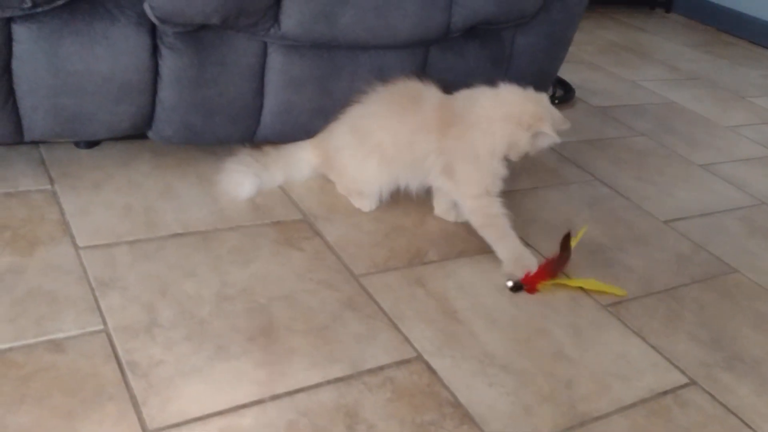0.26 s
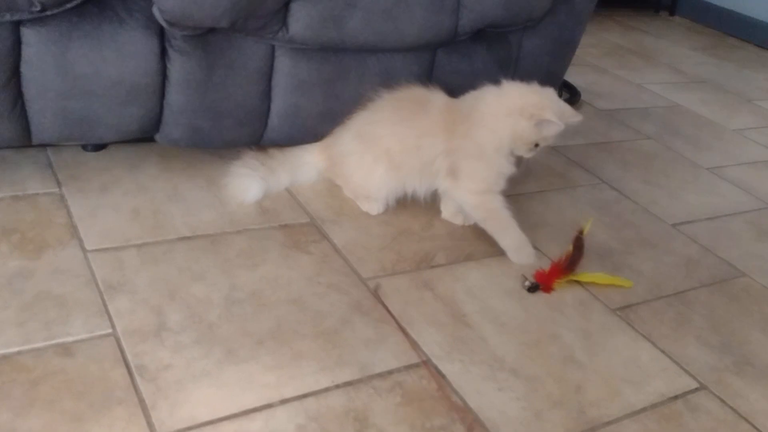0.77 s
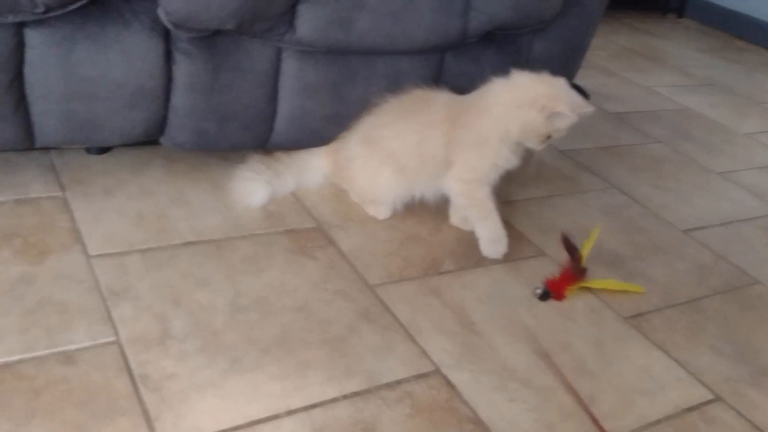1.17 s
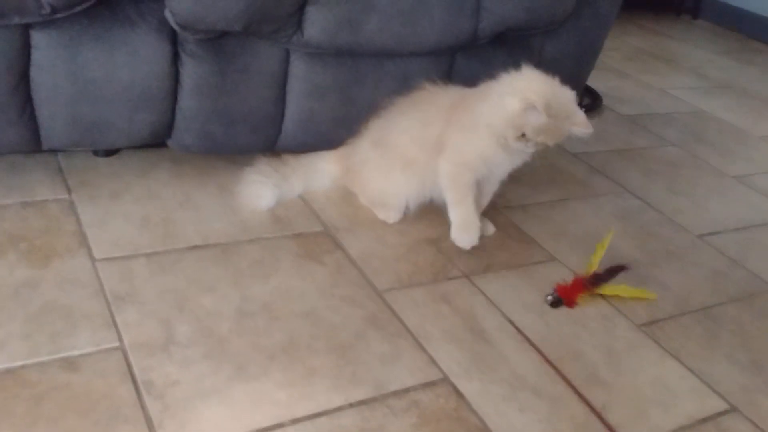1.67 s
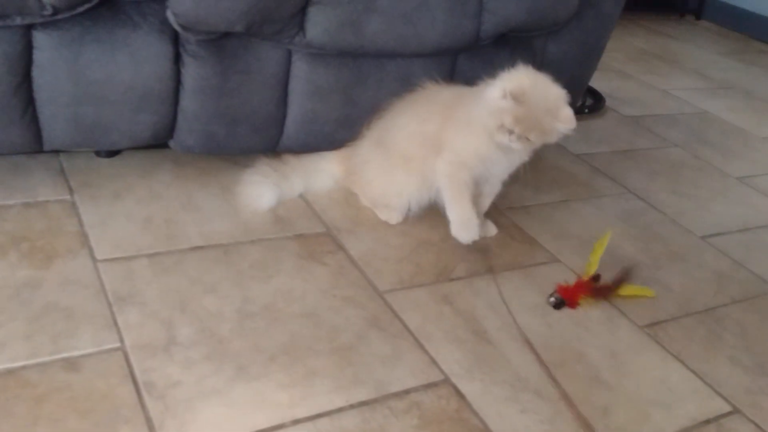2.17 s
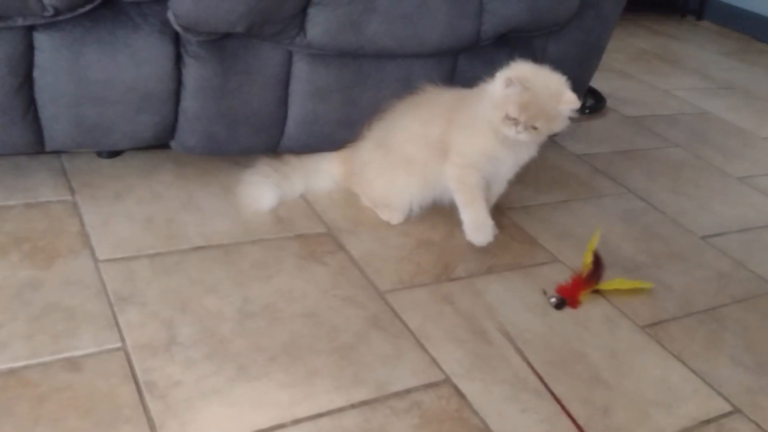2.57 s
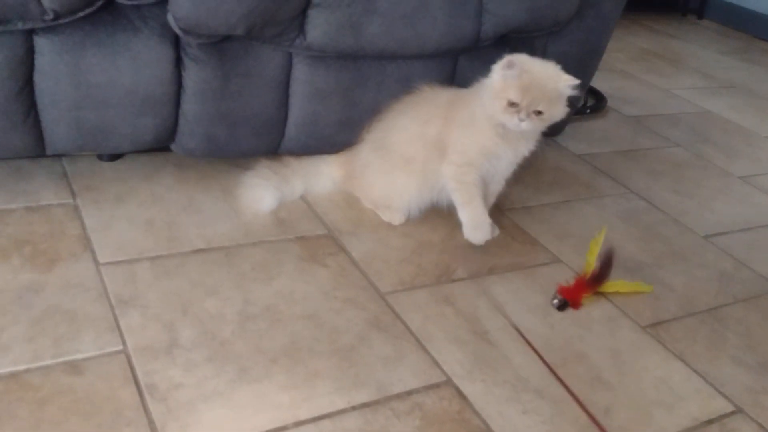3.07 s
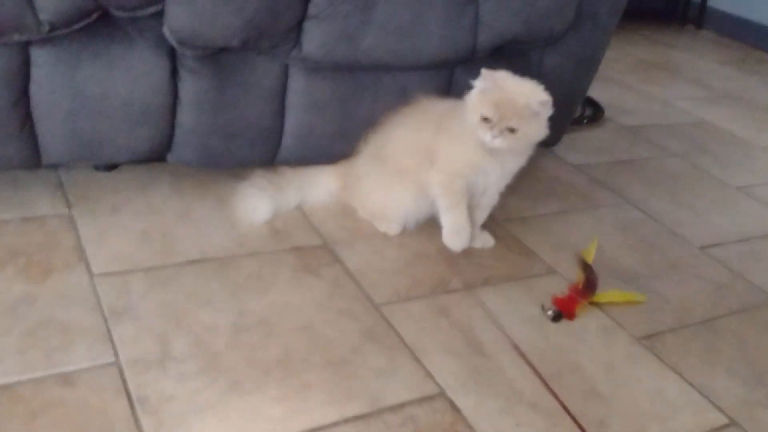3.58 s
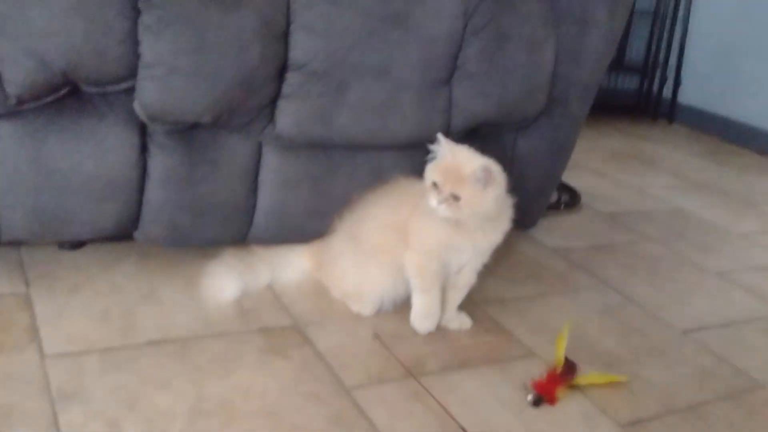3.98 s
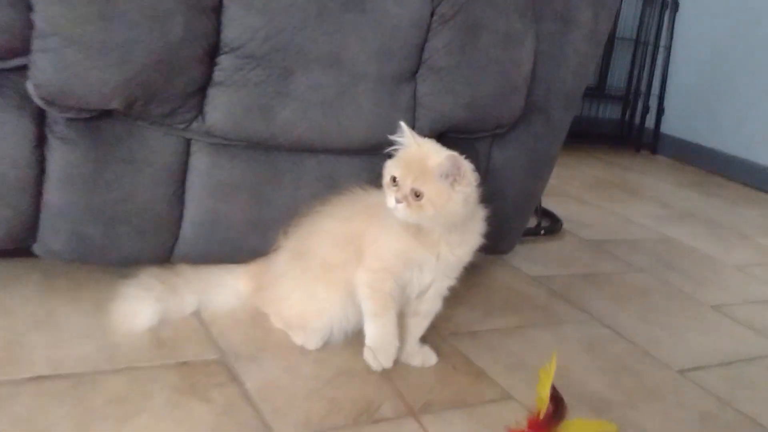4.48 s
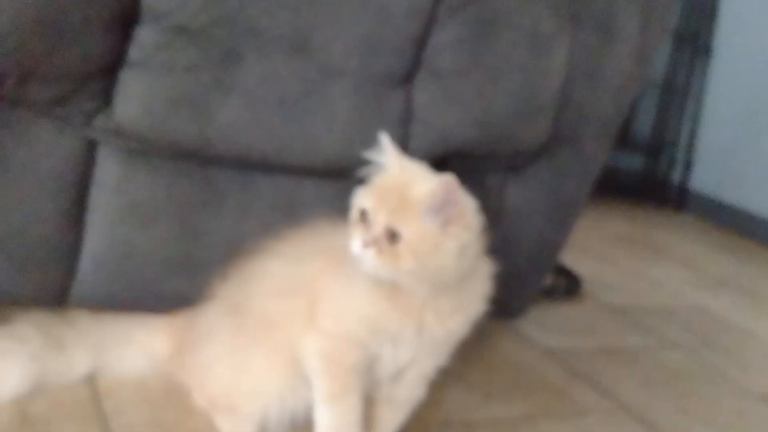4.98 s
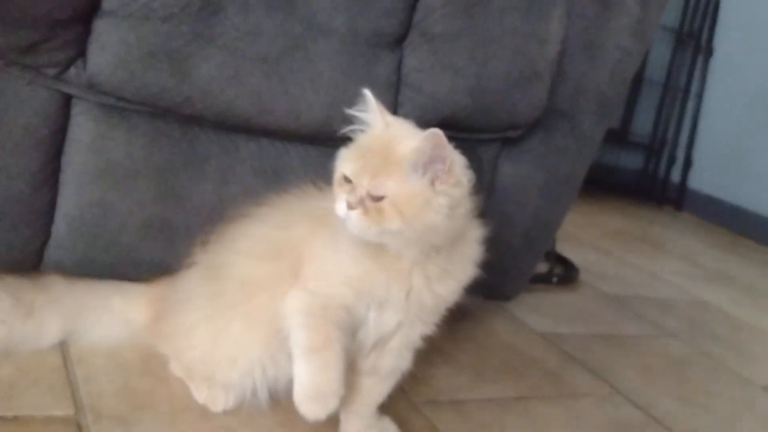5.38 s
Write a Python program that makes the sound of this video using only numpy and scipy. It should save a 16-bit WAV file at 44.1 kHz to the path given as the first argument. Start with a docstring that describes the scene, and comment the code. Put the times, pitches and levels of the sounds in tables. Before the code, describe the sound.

Dry scratches and clicks of a cat toy wand on tile in a quiet living room, with rapid rhythmic rubbing and a faint late jingle.

```python
"""A feather wand is flicked about on a tiled floor for a cat, over the low murmur of a quiet living room.
The thin rod taps the tile and scratches it in strokes, as clicks and friction noise exciting bending modes;
its muffled bell clinks on harder knocks, and early on a faint coo sounds once, a wavering near-sine.
Later the rod shakes to and fro, about nine strokes a second. At last the wand is lifted away: a loose
pellet sets the free bell's decaying modes tinkling, amid dull ticks of paws made of filtered noise."""
import sys
import numpy as np
from scipy import signal
from scipy.fft import rfft, irfft
from scipy.io import wavfile
from scipy.ndimage import map_coordinates

SR = 44100
rng = np.random.default_rng(int(sys.argv[2]) if len(sys.argv) > 2 else 0)


def unload_wav(signal):
    """Save mono or channel-first audio to the path in sys.argv[1] as 16-bit WAV at rate SR, clipped to [-1, 1]."""
    wavfile.write(
        sys.argv[1],
        SR,
        np.round(np.clip(np.atleast_2d(signal).T, -1, 1) * 32767).astype(np.int16),
    )


N = 248724
TIME = np.arange(N) / SR  # s

# All table levels are relative: each source adds its own gain.
# Spectrum of the room's murmur: frequency_hz, density_db (per Hz)
MURMUR_SPECTRUM = [(25, -20), (50, -15), (85, -3), (140, -3), (210, 0.9), (380, -9), (700, -11),
                   (1200, -11), (2200, -16), (4200, -20), (7500, -22), (11000, -26), (15800, -24)]
# Likeness of the murmur in the two ears: frequency_hz, correlation (0-1)
MURMUR_LIKENESS = [(60, 0.69), (150, 0.79), (400, 0.76), (1500, 0.34), (8000, .05)]
# Brief swells of the murmur: centre_s, half_length_s, centre_hz, width_hz, level_db
MURMUR_SWELLS = [(1.95, .2, 85, 50, -77.5), (5.457, .14, 200, 30, -71)]
# Course of the faint coo: time_s, mean_pitch_hz, level_db
COO_COURSE = [(.88, 445, -101), (.92, 453, -63.5), (.96, 463, -58.5), (1.015, 451, -56), (1.05, 418, -77),
              (1.08, 411, -66), (1.1, 405, -61), (1.125, 445, -85)]
# The cat's paws touch the tile: start_s, level_db
PAW_TOUCHES = [(5.233, -66), (5.377, -62), (5.411, -63), (5.483, -67)]
# The muffled bell clinks on harder knocks: start_s, level_db
MUFFLED_STRIKES = [(0.3666, -42), (0.571, -49), (0.7659, -45.5), (4.9434, -38)]
# Modes of the muffled bell: frequency_hz, level_db, t60_s
MUFFLED_BELL_MODES = [(3080, -1.5, .04), (3326, 3, .05), (3810, -7.5, .03), (7300, -12, .04),
                      (13800, -10, .04)]
# The pellet strikes the free bell: start_s, level_db
PELLET_STRIKES = [(5.3064, -48.5), (5.317, -47), (5.329, -58), (5.357, -59), (5.3808, -59.5)]
# Modes of the free bell: frequency_hz, level_db, t60_s
FREE_BELL_MODES = [(2950, -9.5, 0.3), (3190, -11.5, 0.25), (3240, -9.5, 0.17), (7130, -1, 0.077),
                   (7356, -12.5, 0.16), (9100, -10, 0.14), (12930, -2, 0.08), (13020, -14, .19),
                   (13923, 4, 0.13), (14005, -5, 0.18)]
# Single strokes of the rod over the tile: start_s, fastest_s, end_s, level_db
SINGLE_STROKES = [(-0.02, 0.001, 0.025, -29), (0.168, 0.182, 0.248, -34.5), (0.367, 0.426, 0.457, -26.5),
                  (0.577, 0.635, 0.654, -23), (0.764, 0.774, 0.885, -36.5), (0.867, 0.897, 1.004, -39),
                  (1.006, 1.04, 1.084, -28), (1.078, 1.098, 1.205, -34.5), (1.182, 1.228, 1.258, -28.5),
                  (1.377, 1.423, 1.446, -27), (1.479, 1.53, 1.563, -28), (1.567, 1.607, 1.645, -30.5),
                  (1.683, 1.692, 1.726, -30.5), (1.734, 1.763, 1.798, -29.5), (1.863, 1.896, 1.918, -33),
                  (3.172, 3.206, 3.252, -31), (3.346, 3.387, 3.406, -34.5), (4.335, 4.386, 4.413, -29.5),
                  (4.435, 4.492, 4.506, -27.6), (5.099, 5.165, 5.194, -33)]
# Even shakes to and fro: start_s, end_s, stroke_count, hardest_s, level_there_db
EVEN_SHAKES = [(1.917, 3.18, 12, 2.567, -23.5), (3.52, 4.332, 7, 4.075, -25.5)]
# Knocks of the rod on the tile: start_s, level_db, bass_db
KNOCKS = [(0.1666, -21.5, 10), (0.175, -26, 12), (0.3672, -22.5, 6), (0.5682, -24, 8), (0.5965, -30.5, 1),
          (0.7653, -25.5, 8.5), (0.773, -29, 4), (0.859, -32, -16), (0.876, -23, 2), (0.9114, -30.5, 2),
          (1.0147, -27, -3.5), (1.2053, -27.5, 0), (1.3489, -30.5, 9), (1.3913, -34, 9), (1.6822, -32, -5),
          (1.7535, -31, 6), (1.8648, -29.5, 7), (2.611, -22.5, 4.5), (3.3374, -30.5, 12), (3.4956, -31, 12),
          (3.8961, -22.5, -9), (3.9361, -21.5, -7), (4.9408, -21.5, 7), (4.9587, -25.2, 1.5),
          (5.0974, -35, 9)]
# Sound of a contact along the wand's path: time_s, left_minus_right_db, middle_db, sliding_bass_db
CONTACT_SPOTS = [(0, 2.5, 1.5, 0.5), (.17, 7, -4, 2.5), (.6, 1.5, -6.5, 1.5), (.78, 0, -4.5, -2),
                 (.88, 3, 2.5, -1), (1.2, -2.5, 2.5, -4), (1.42, -1, -1.5, 4.5), (1.75, -3, -1.5, 2),
                 (2.1, -2, 0, -1), (2.6, -1, 0, 1), (3.0, -1, -1.2, -2), (3.3, -1.5, -6, 0.5),
                 (3.65, -0.5, -2, -0.5), (4.35, 0.3, -2.5, 0.5), (4.49, -3, -1.5, 4), (4.95, 0.5, -11, 0.5)]
# Corners of a contact's colour [Hz]: thud, bass from, bass to, middle, upper middle, treble
COLOUR_CORNERS_HZ = [450, 1000, 3300, 5800, 9200, 13500]
# Broad spectrum of the contact: frequency_hz, density_db (per Hz)
CONTACT_SPECTRUM = [(40, -73), (200, -30.5), (500, -22.5), (900, -19), (2000, -13.5), (3500, -17),
                    (4300, -29.5), (4700, -9), (6000, -1), (8500, -10.5), (9500, -5), (12000, -0.5),
                    (14200, -14), (15200, -2.5)]
# Bending modes of the rod: frequency_hz, half_width_hz (to half amplitude), level_db, left_minus_right_db
ROD_MODES = [(1084, 120, -23, 11), (1643, 100, -14.5, 2), (2480, 168, -12, -8.5), (3320, 234, -9, -1.5),
             (3910, 194, -13, 9.5), (4666, 100, -8.5, -7.5), (4960, 220, -7, 5), (5600, 130, -1.5, -5.5),
             (6190, 630, -5, 7), (6620, 190, -2.5, 7), (7250, 190, -8, -20), (7823, 180, 3, 7),
             (8100, 310, -12, -2.5), (8760, 610, -1.5, -9.5), (10060, 170, 3, 1), (11050, 130, 1.5, -1.5),
             (11300, 230, -13, 4), (13100, 97, -28.5, -7), (13480, 270, -4, -7), (15030, 710, 0, -1.5)]
# Direction of the wand: time_s, left_ear_lag_samples
WAND_BEARING = [(0, 3.9), (1.1, 5.22), (1.7, 10.33), (3.2, 10.55), (4.2, 5.5), (5.6, 3.05)]

OUT_FASTEST, BACK_FASTEST = 0.48, 0.64  # share of an outward and a return stroke at which it runs fastest
SWING_PAN_DB = 0.77  # outward strokes sound this much further right, return strokes further left
SWING_DB = 0.63  # outward strokes are this much harder, return strokes softer
EASE_DB, EASE_S = 4.5, 0.5  # the hand is this much softer this far from its hardest moment
STROKE_OVERLAP_S = 0.0011  # the rod still slides as the hand turns
USUAL_STROKE_DB, BASS_LOSS_PER_DB = -28, 0.59  # a harder stroke is thinner: bass dB lost per dB above usual
TREBLE_PER_MIDDLE = -0.33  # treble gained where the middle is weak [dB per dB]


def from_db(db):
    """Logarithmic law of level: decibels to amplitude gain."""
    return 10 ** (np.asarray(db) / 20)


def unit_energy(x):
    """Parseval's principle: a response of unit energy keeps the power of white noise."""
    return x / np.sqrt(np.sum(x ** 2, axis=-1, keepdims=True))


def at_hz(points, hz):
    """Logarithmic frequency scale: interpolate (frequency, value) rows along it."""
    frequency, value = np.transpose(points)
    return np.interp(np.log(hz + 1), np.log(frequency), value)


def causal(gain):
    """Minimum phase: folding the cepstrum gives the promptest response of this gain."""
    cepstrum = irfft(np.log(gain + 1e-6))
    half = len(cepstrum) // 2
    cepstrum[1:half] *= 2
    cepstrum[half + 1:] = 0
    return irfft(np.exp(rfft(cepstrum)))


def through(x, response):
    """Linear superposition: convolve a stereo signal with an impulse response."""
    return signal.fftconvolve(x, np.atleast_2d(response), axes=-1)[:, :N]


def wobble(t, per_s):
    """Random fluctuation: linear between normal values drawn per_s times a second."""
    knots = rng.standard_normal(1024)
    return np.interp((t - t[0]) * per_s, np.arange(len(knots)), knots)


def band_noise(low_hz, high_hz):
    """Band limitation: white noise through a bandpass, scaled to unit power."""
    band = signal.butter(2, [low_hz, high_hz], "band", fs=SR, output="sos")
    noise = signal.sosfilt(band, rng.standard_normal(N))
    return noise / noise.std()


def room_tone(level_db=-68.0):
    """Diffuse-field coherence: steady murmur alike in both ears mainly in the bass."""
    hz = np.fft.rfftfreq(N, 1 / SR)
    mid, side = rfft(rng.standard_normal((2, N))) * from_db(at_hz(MURMUR_SPECTRUM, hz))
    alike = np.clip(at_hz(MURMUR_LIKENESS, hz), 0, 1)
    ears = np.sqrt(1 + alike) * mid + np.sqrt(1 - alike) * side * [[1], [-1]]
    noise = irfft(ears, N)
    return from_db(level_db) * noise / noise.std()


def swells():
    """Amplitude modulation: narrow bands of low noise fade in and out under Gaussian envelopes."""
    out = np.zeros(N)
    for centre_s, half_s, hz, width, db in MURMUR_SWELLS:
        envelope = np.exp(-((TIME - centre_s) / half_s) ** 2)
        out += from_db(db) * envelope * band_noise(max(hz - width / 2, 20), hz + width / 2)
    return out


def coo(overtone_db=-20.0, quaver=0.023, flutter_db=2.5):
    """Frequency modulation: a near-sine whose wavering pitch rises, falls and lifts at the end."""
    s, hz, db = np.transpose(COO_COURSE)
    pitch = np.interp(TIME, s, hz) * (1 + quaver * wobble(TIME, per_s=72))
    phase = 2 * np.pi * np.cumsum(pitch) / SR
    loudness = np.interp(TIME, s, from_db(db), left=0, right=0)
    loudness = loudness * from_db(flutter_db * wobble(TIME, per_s=130))
    return np.sqrt(2) * loudness * (np.sin(phase) + from_db(overtone_db) * np.sin(2 * phase))


def paws(low_hz=800, high_hz=2100, decay_s=0.0015):
    """Damped soft impact: each paw gives a dull, band-limited tick that dies exponentially."""
    touch = np.zeros(N)
    for s, db in PAW_TOUCHES:
        touch += from_db(db) * (TIME > s) * np.exp(-np.abs(TIME - s) / decay_s)
    return touch * band_noise(low_hz, high_hz)


def bell(strikes, modes, level_db, click_db, strength_spread_db=2.6):
    """Modal superposition: each strike clicks and excites every damped mode with a new strength."""
    s, db = np.transpose(strikes)
    at, out = np.round(s * SR).astype(int), np.zeros(N)
    out[at] = from_db(db + click_db)
    for hz, mode_db, t60 in modes:
        clicks = np.full(N, 1e-18)  # just above zero
        clicks[at] = from_db(db + mode_db + rng.normal(0, strength_spread_db, len(at)))
        r, w = from_db(-60 / (t60 * SR)), 2 * np.pi * hz / SR  # pole radius and angle
        out += signal.lfilter([0, np.sin(w)], [1, -2 * r * np.cos(w), r * r], clicks)
    return from_db(level_db) * out


def spot(s):
    """Dependence on contact point: pan, middle, treble and sliding bass [dB] at time s."""
    times, *columns = np.transpose(CONTACT_SPOTS)
    pan, middle, bass = [np.interp(s, times, column) for column in columns]
    return pan, middle, TREBLE_PER_MIDDLE * middle, bass


def reflections(decay_s, size=1024):
    """Early reflection: a quick cluster of echoes, different for each ear; energy 1."""
    t = np.arange(size) / SR
    return unit_energy(rng.standard_normal((2, size)) * np.exp(-t / decay_s) * (t > .0002))


def add(out, s, force, bass_db, middle_db, treble_db, pan_db, size=512):
    """Filtering and reflection: colour a contact, add fresh floor echoes, pan it and mix it in at s."""
    hz = np.fft.rfftfreq(size, 1 / SR)
    corner_db = [0, bass_db, bass_db, middle_db, 0, treble_db]
    colour = from_db(at_hz(list(zip(COLOUR_CORNERS_HZ, corner_db)), hz))
    paths = from_db(-4.5) * reflections(decay_s=.0018)
    paths[:, 0] += 1  # direct path
    coloured = np.convolve(force, causal(colour))
    sound = signal.fftconvolve([coloured], unit_energy(paths))
    at = round(s * SR)
    sound, at = sound[:, max(-at, 0):N - at], max(at, 0)
    out[:, at:at + sound.shape[1]] += from_db([[pan_db / 2], [-pan_db / 2]]) * sound


def slips(per_s, spread_db, hiss):
    """Stick-slip friction: uneven tiny collisions at a changing rate, over fine noise; power 1."""
    n = len(per_s)
    sizes = from_db(spread_db * np.minimum(rng.exponential(1, n), 3.5)) * rng.choice([-1, 1], n)
    happens = rng.random(n) < per_s / SR
    clicks = sizes * happens / np.sqrt(per_s / SR)  # rarer collisions are larger
    clicks = clicks / np.sqrt(np.mean(clicks ** 2) + 1e-9)
    friction = clicks + hiss * rng.standard_normal(n)
    return friction / np.sqrt(np.mean(friction ** 2))


def shaken():
    """Reciprocating motion: equal strokes out and back (start_s, fastest_s, end_s, level_db, pan_db)."""
    rows = []
    for start, end, count, hardest, db in EVEN_SHAKES:
        turns = np.linspace(start, end, count + 1)
        for k, (begin, stop) in enumerate(zip(turns, turns[1:])):
            share, outward = (BACK_FASTEST, -1) if k % 2 else (OUT_FASTEST, 1)
            fastest = begin + share * (stop - begin)
            effort_db = db + outward * SWING_DB - EASE_DB * ((fastest - hardest) / EASE_S) ** 2
            rows.append((begin, fastest, stop + STROKE_OVERLAP_S, effort_db, -outward * SWING_PAN_DB))
    return rows


def strokes(level_db=-3.5, slips_per_s=3300, swell=1.06, skip_db=2.0, skips_per_s=250):
    """Velocity-dependent friction: the faster the rod runs, the harder and oftener it hits bumps."""
    out = np.zeros((2, N))
    for start, fastest, end, db, swing_pan in [(*row, 0) for row in SINGLE_STROKES] + shaken():
        t = np.arange(start, end, 1 / SR)
        peak = min(fastest, end - .01)  # leave at least 10 ms to stop
        speed = np.abs(np.sin(np.interp(t, [start, peak, end], [0, np.pi / 2, np.pi])))
        pressure = from_db(skip_db * wobble(t, skips_per_s))  # the springy rod skips as it slides
        bump_rate = slips_per_s * (.3 + speed)
        force = speed ** swell * pressure * slips(bump_rate, spread_db=3.5, hiss=0.47)
        pan, middle, treble, bass = spot(fastest)
        bass = bass - 0.5 - BASS_LOSS_PER_DB * (db - USUAL_STROKE_DB)
        add(out, start, from_db(db + level_db) * force, bass, middle + 0.2, treble + 1.8, pan + swing_pan)
    return out


def taps(level_db=16.5, chatter=0.94, chatter_s=0.004, treble_db=3.5, size=900):
    """Impact excitation: one hard click, then a few milliseconds of chatter as the rod settles."""
    out, t = np.zeros((2, N)), np.arange(size) / SR
    for s, db, bass in KNOCKS:
        force = chatter * unit_energy(rng.standard_normal(size) * np.exp(-t / chatter_s))
        force[0] += 1
        pan, middle, treble, _ = spot(s)
        add(out, s, from_db(db + level_db) * force, bass, middle, treble + treble_db, pan)
    return out


def wand(force, modes_db=4.0, stiffness=0.6085, order=26, size=4096):
    """Bending resonance and dispersion: the rod rings in modes that each radiate their own way."""
    hz = np.fft.rfftfreq(size, 1 / SR)
    power = from_db(at_hz(CONTACT_SPECTRUM, hz)) ** 2
    for centre, half_width, db, pan in ROD_MODES:
        height = from_db(db + modes_db + np.array([[pan], [-pan]]) / 2)
        resonance = np.minimum(hz / centre, 1) / (1 + ((hz - centre) / half_width) ** 2)
        power = power + (height * resonance) ** 2
    # low bending waves travel slower and arrive later: a chain of allpasses
    z = np.exp(-2j * np.pi * hz / SR)
    dispersion = ((z - stiffness) / (1 - stiffness * z)) ** order
    prompt = [causal(np.sqrt(ear)) for ear in power]
    response = irfft(rfft(prompt) * dispersion)[:, :size // 2]
    return through(force, response / np.sqrt(np.sum(response ** 2) / 2))


def from_bearing(x):
    """Interaural time difference: sound from the right reaches the left ear a little later."""
    lag, n = np.interp(TIME, *np.transpose(WAND_BEARING)), np.arange(N)
    return np.array([map_coordinates(x[0], [n - lag], order=5), x[1]])


def room(x, tail_db=-7.0, t60=0.24, build_s=0.0014):
    """Reverberation: direct sound plus the short diffuse tail of a furnished room."""
    t = np.arange(SR // 2) / SR
    envelope = from_db(-60 * t / t60) * (1 - np.exp(-(t / build_s) ** 2))
    late = unit_energy(rng.standard_normal((2, len(t))) * envelope)
    return x + from_db(tail_db) * through(x, late)


def scene():
    """Superposition: wand, bell, paws and coo in the room, over its murmur."""
    rod = from_bearing(wand(strokes() + taps()))
    clinks = bell(MUFFLED_STRIKES, MUFFLED_BELL_MODES, level_db=-4.0, click_db=-5.0)
    tinkle = bell(PELLET_STRIKES, FREE_BELL_MODES, level_db=-6.0, click_db=12.5)
    sources = rod + clinks + tinkle + paws() + coo()
    return from_db(0.5) * room(sources) + room_tone() + swells()


def record(dry, cutoff_hz=16000):
    """Band limitation: a steep elliptic lowpass cuts the top."""
    return signal.sosfilt(signal.ellip(12, .2, 70, cutoff_hz, fs=SR, output="sos"), dry)


dry = scene()
out = record(dry)
unload_wav(out)
```